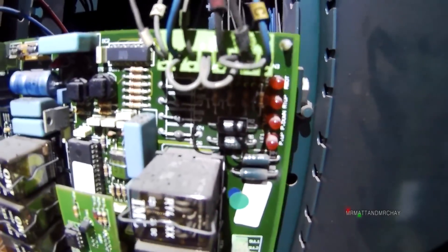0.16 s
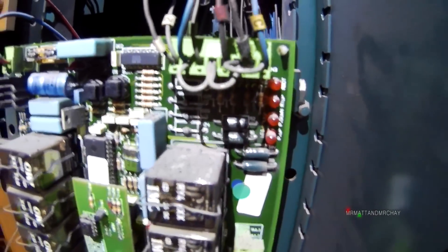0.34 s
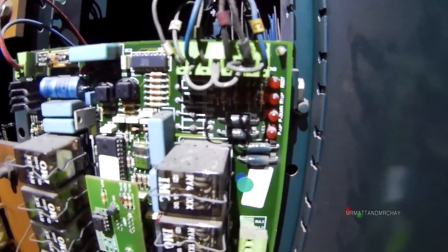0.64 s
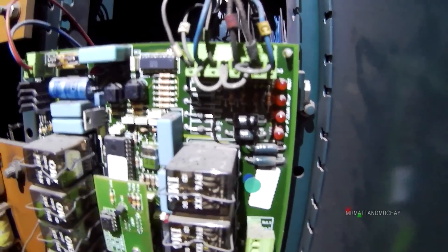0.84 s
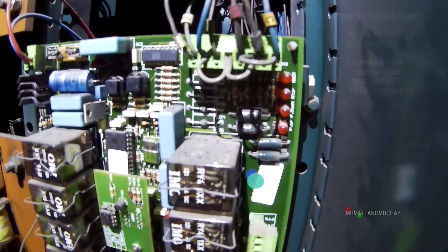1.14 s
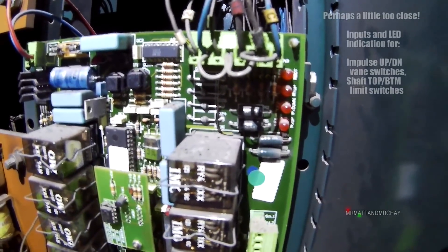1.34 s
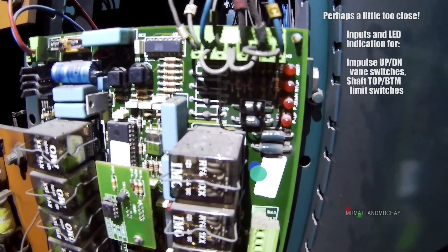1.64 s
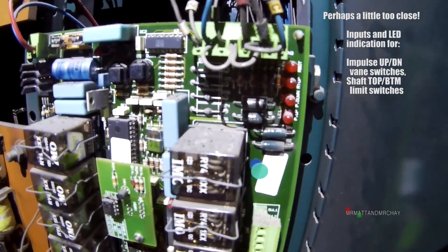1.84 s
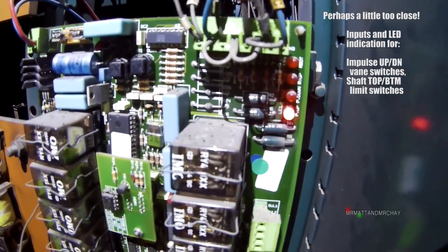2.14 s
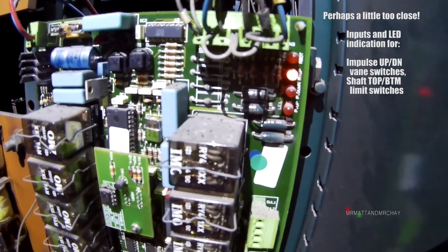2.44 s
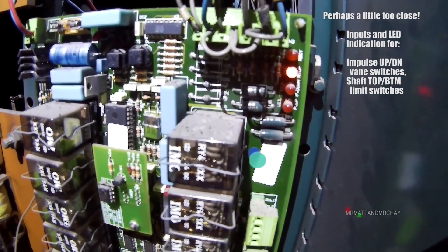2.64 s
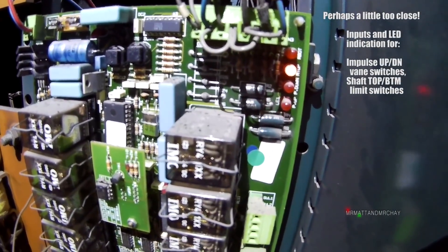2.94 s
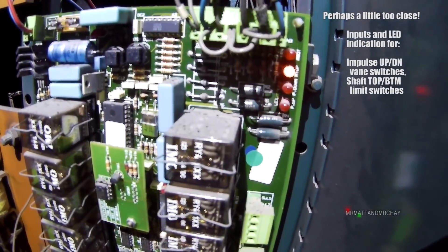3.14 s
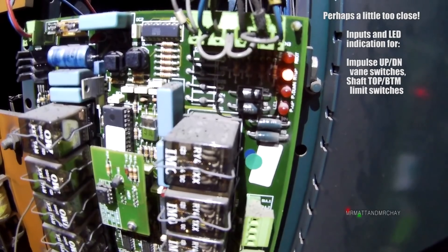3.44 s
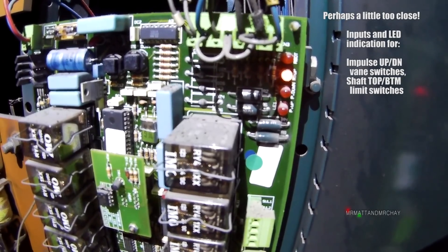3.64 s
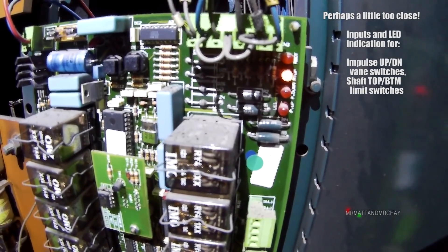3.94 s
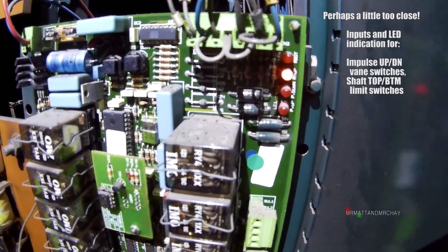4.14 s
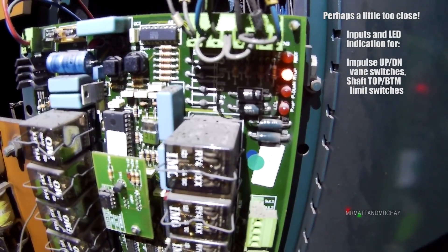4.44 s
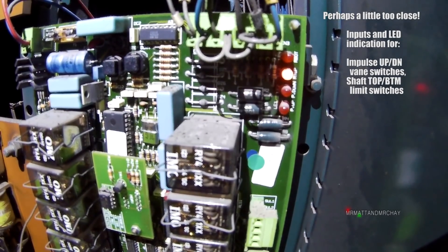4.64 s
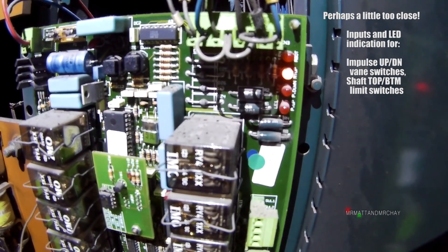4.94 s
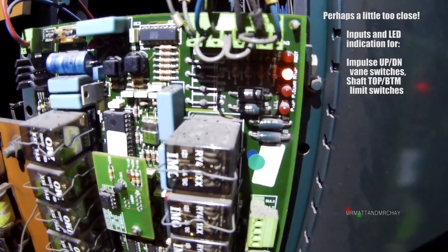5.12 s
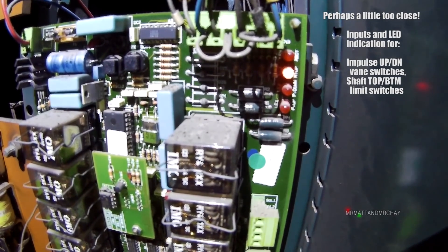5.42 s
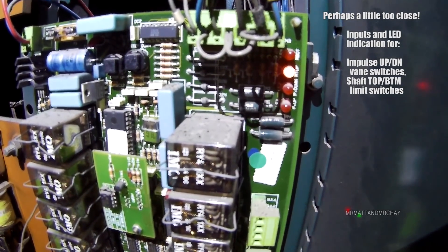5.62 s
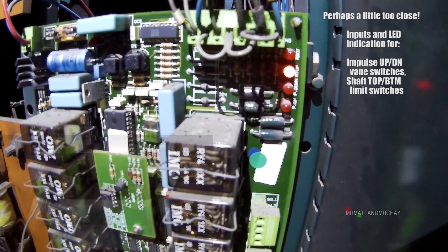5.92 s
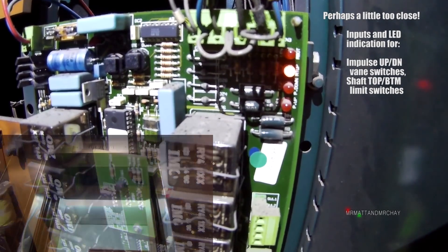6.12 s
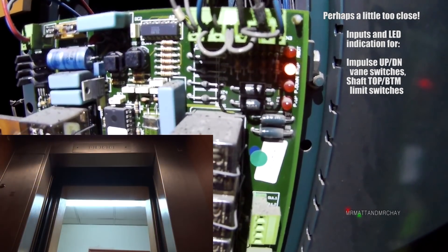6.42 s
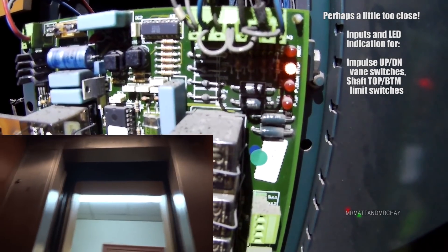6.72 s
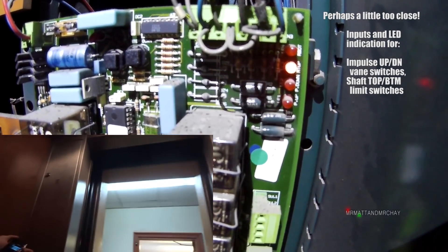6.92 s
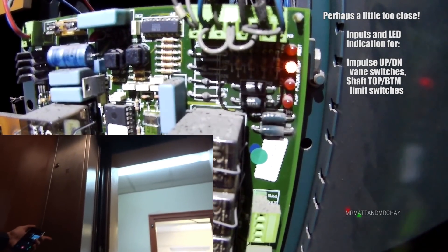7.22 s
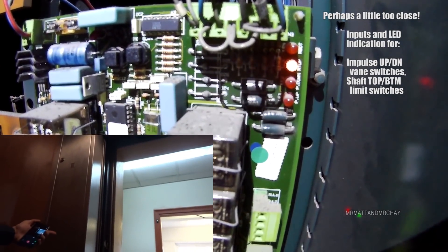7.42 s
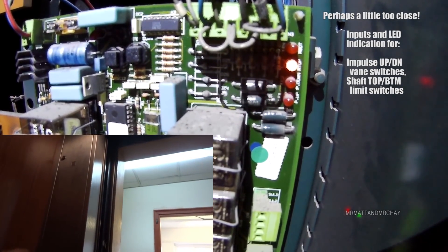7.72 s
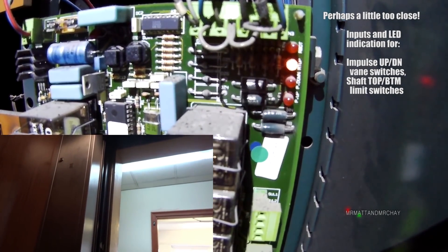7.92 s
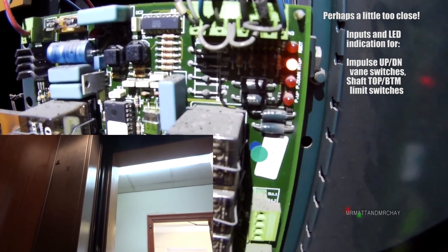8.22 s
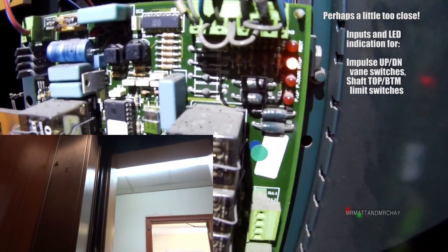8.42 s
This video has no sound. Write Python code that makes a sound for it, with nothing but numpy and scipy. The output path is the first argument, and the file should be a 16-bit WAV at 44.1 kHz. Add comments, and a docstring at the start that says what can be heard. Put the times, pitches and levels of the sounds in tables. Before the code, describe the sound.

Sharp bright relay clicks and heavy contactor clunks punctuate a lift motor going fast, slow, then stopping, leaving faint hum and dull far knocks.

```python
"""Relays snap, bounce and ring on a lift controller in a hard-walled motor room, heard from right beside them.
Each is a burst of shaped noise plus ringing spring tones; contactors add heavier clacks, thuds and booms.
The hoist motor, made of noise and wavering tones, goes from fast to slow and then runs down.
After a pause the last relays and contactors drop and far clunks follow from down the shaft.
Steady mains hum and still room air lie under it all, with a faint tick before and after the clunks."""
import sys
import numpy as np
from scipy import signal
from scipy.fft import rfft, irfft, next_fast_len
from scipy.io import wavfile
from scipy.ndimage import map_coordinates

SR = 44100
rng = np.random.default_rng(int(sys.argv[2]) if len(sys.argv) > 2 else 0)


def file_out(sig):
    """Save sig as 16-bit WAV at sys.argv[1]."""
    # one column per channel
    cols = np.atleast_2d(sig).T
    # limit, then scale
    lim = np.clip(cols, -1, 1)
    pcm = np.round(lim * 32767).astype(np.int16)
    wavfile.write(sys.argv[1], SR, pcm)


N = 377937
TIME = np.arange(N) / SR  # seconds

# In all tables t60 is the time to fade by 60 dB, and levels are those before the final mix.
# Transformer hum and supply whistle. Each row: frequency in Hz, level in dB.
MAINS = [(100, -56), (200, -75), (300, -80), (400, -74.5), (600, -76.5), (13715, -62), (14933, -75)]
# Colour of the still room air. Each row: frequency in Hz, relative level in dB.
AIR_COLOUR = [(20, -9.5), (50, 1.5), (90, -6.5), (160, -18.5), (400, -11), (800, -21), (1300, -21.5),
              (5000, -28), (9800, -24.5), (15500, -33.5)]
# Faint ticks. Each row: start in seconds, level in dB.
TICKS = [(6.868, -45.5), (8.205, -54)]
# Colour of a tick. Each row: frequency in Hz, relative level in dB.
TICK_COLOUR = [(600, -25), (1000, 3), (1500, -16), (3000, -20), (3900, -1), (4800, -20), (9000, -30)]

# Stages of the motor. Each: start in seconds, end of the hold in seconds, level in dB,
# rise in seconds, fall in dB per second.
FAST_RUN = (-1, 2.2, -30, .1, 22)  # whirr on the fast winding
FAST_TONES = (-1, 1.82, 1, .1, 95)  # its whine, which stops quickly once cut
SLOW_RUN = (2.1, 4.75, -34, .3, 32)  # whirr on the slow winding
INRUSH = (2.04, 2.42, -37, .08, 70)  # magnetic buzz as the slow winding brakes the rotor
COASTING = (5.0, 7.0, -53, .2, 17)  # the machine running down
# Colours of the motor's noise. Each row: frequency in Hz, relative level in dB.
FAST_COLOUR = [(20, -30.5), (35, -21.5), (54, -8), (70, -13.5), (170, -15.5), (255, -10.5), (330, -8),
               (410, -9), (870, -10.5), (1150, -9), (1330, -18.5), (2000, -13.5), (3000, -23), (8000, -31),
               (9800, -26), (15500, -44.5)]
SLOW_COLOUR = [(20, -22), (55, -13.5), (160, -14), (340, -8.5), (600, -5.5), (830, -4), (1150, -10),
               (1700, -16.5), (3100, -31.5), (7500, -34), (9600, -28), (12000, -38), (15500, -44.5)]
COAST_COLOUR = [(20, -9), (50, -3), (110, -11), (200, -16), (310, -17), (430, -12), (800, -17), (1100, -29),
                (2200, -33), (3600, -36), (10000, -36), (15500, -39)]
# Tones of the fast winding, slow winding and running down. Each row: frequency in Hz, level in dB.
FAST_LINES = [(145.3, -46), (194, -47.5), (200.8, -36.5), (290.7, -32), (425.3, -47.5), (592.2, -43),
              (656.8, -48), (866.7, -49.5), (1163, -49), (1260, -48.5), (1615, -49), (1868, -53.5),
              (1970, -46.5), (2008, -53), (2363, -47), (2433, -52), (2724, -60)]  # the close pair near 200 Hz beats
SLOW_LINES = [(344.5, -50), (516.8, -51), (592.2, -47), (818.3, -47), (1152, -53), (1217, -56)]
COAST_LINES = [(398.4, -68), (436.0, -66), (608.3, -67), (786.0, -73)]
# Parts of the inrush buzz. Each row: multiple of the lowest hum tone, relative level in dB.
BUZZ = [(1, 0), (2, -1), (3, -11)]

# Blows from down the shaft. Each row: start in seconds, level in dB.
FAR_CLUNKS = [(7.392, -40), (7.411, -30.5), (7.44, -35), (7.495, -35.5)]
# Colour of a far clunk. Each row: frequency in Hz, relative level in dB.
FAR_COLOUR = [(100, -40), (200, -18.5), (350, -10), (480, -10), (580, -11), (780, -1), (950, -6.5),
              (1350, -21.5), (2000, -24.5), (3200, -36.5), (9000, -36.5), (13000, -54.5)]

# Contactor and brake blows. Each row: start in seconds, clack level in dB,
# weight of the moving part from 0 to 1, floor boom in dB relative to the clack.
BLOWS = [(1.991, -21, .35, -21), (2.108, -27, .92, -15), (2.18, -23.5, .3, -19), (2.244, -28.5, .25, -18),
         (2.46, -21.5, .55, -27), (2.484, -19, .92, -24), (2.56, -24.5, 1, -17), (3.764, -22.5, .03, -28),
         (3.928, -14, .22, -19), (4.01, -22, .78, -13.5), (4.242, -25.5, .22, -17), (4.31, -22, .72, -12),
         (4.39, -21.5, .66, -12), (4.475, -24.5, .8, -10.5), (4.63, -30, .68, -11.5),
         (4.818, -15.5, .52, -26), (4.89, -25, .82, -23), (4.975, -26.5, .35, -23), (5.17, -30, .5, -26),
         (7.016, -29.5, .05, -26), (7.046, -24.5, .76, -10)]
# Colour of a clack. Each row: multiple of its centre frequency, relative level in dB.
CLACK_COLOUR = [(.1, -33.5), (.25, -22), (.6, -3), (1, 0.5), (1.5, -5.5), (2.3, -9.5), (3, -10), (3.6, -23),
                (4.7, -17), (9, -25), (17, -41)]
# Colours of the frame's thud and the floor's boom. Each row: frequency in Hz, relative level in dB.
THUD_COLOUR = [(60, -23), (110, -11.5), (160, -7.5), (200, -1), (270, -2), (400, -1.5), (600, -11),
               (1000, -15.5), (3000, -46)]
BOOM_COLOUR = [(20, -19), (38, -6), (54, 1.5), (75, -6), (110, -7), (200, -27), (600, -62)]
# Ringing of the steel cabinet and the room. Each row: frequency in Hz, width in Hz,
# level in dB relative to the direct sound.
CABINET = [(122, 10, 1), (197.4, 5.7, 6.5), (265, 16, -0.5), (364, 9.5, -3), (412.6, 11, -2.5), (436, 8, 0),
           (501.5, 14, 2), (595, 7, 2.5), (651, 10, 1), (788, 16, -3), (869, 30, 1), (1135, 22, -2),
           (1427, 15, -2.5)]

# Relays switching. Each row: start in seconds, snap level in dB, t60 of the snap in seconds,
# rattle of the case in dB relative to the snap.
RELAYS = [(1.846, 0, .095, -18.5), (1.891, -13, .16, -15), (1.907, -9.5, .11, -22), (1.991, 2, .065, -15.5),
          (2.105, -9.5, .05, -17.5), (2.179, -6, .05, -10), (2.219, -2.5, .1, -20), (2.242, -1, .11, -16.5),
          (2.432, -14, .17, -15.5), (2.459, -10, .1, -8), (2.467, 1, .03, -15), (2.484, -2.5, .115, -12.5),
          (2.546, -7.5, .032, -22), (2.565, -9.5, .05, -21), (3.760, -5, .11, -18), (3.907, -28, .15, -14),
          (3.928, 3.5, .038, -16), (4.235, -5, .14, -16), (4.245, -.5, .06, -13), (4.286, -10, .21, -12),
          (4.309, -7.5, .15, -12), (4.326, -7.5, .14, -17), (4.366, -14, .27, -18), (4.392, -10, .19, -11),
          (4.463, -19, .34, -8.5), (4.625, -4.5, .14, -19.5), (4.664, -9, .095, -19.5),
          (4.803, -8, .04, -23), (4.818, -1, .085, -9.5), (4.888, -18, .1, -9), (5.166, -8.5, .11, -23),
          (7.013, -7.5, .22, -22), (7.045, -5.5, .13, -15.5)]
# Tones of relay springs and armature. Each row: frequency in Hz, relative level in dB, t60 in seconds.
SPRINGS = [(6080, -20, 0.11), (7075, -6.5, .18), (7252, -6.5, .18), (8200, -17.5, 0.14), (8730, -11, 0.099),
           (9250, -8.5, .14), (9240, -3, .17), (9217, -5, .15), (9600, 1.5, 0.19), (10060, -1, .16),
           (9740, -4.5, .16), (10500, -2.5, .16), (10560, -6, .12), (13110, -15, 0.087)]
# Colours of the snap and the plastic case. Each row: frequency in Hz, relative level in dB.
SNAP_COLOUR = [(2500, -44.5), (4200, -16), (5000, -16.5), (6000, -9), (7100, -7), (7900, -8.5), (9000, -2),
               (9700, 2), (10700, -7.5), (12000, -10), (15500, -15)]
CASE_COLOUR = [(400, -25.5), (1000, -5.5), (1700, 0.5), (2400, 0.5), (3100, -8.5), (3900, -0.5), (5000, -5),
               (8000, -18)]
# Echo of the bare walls. Each row: frequency in Hz, t60 in seconds.
ROOM = [(100, 0.98), (400, .9), (1300, 0.98), (3500, 0.6), (9500, 0.4), (15000, .3)]


def amp(db):
    """Turn decibels into a gain."""
    return 10 ** (np.asarray(db) / 20)


def unit(x):
    """Scale a sound to an average (rms) strength of 1."""
    return x / np.sqrt(np.mean(x ** 2) + 1e-20)


def along(points, hz):
    """Read values between (Hz, value) points, with frequency on a log axis."""
    f, v = np.transpose(points)
    return np.interp(np.log(hz + 1), np.log(f + 1), v)


def wobble(rate):
    """Draw a smooth random curve with this many random points a second."""
    knots = rng.standard_normal(int(N * rate / SR) + 4)
    return map_coordinates(knots, [TIME * rate])


def flicker(t, rate):
    """Draw a smooth random curve for a short sound; it repeats after 256 random points."""
    return map_coordinates(rng.standard_normal(256), [t * rate], mode="wrap")


def noise(colour, size, body=1):
    """Make noise of rms 1 with a colour, passed through the resonances of a body."""
    hz = np.fft.rfftfreq(size, 1 / SR)
    white = rfft(rng.standard_normal(size))
    return unit(irfft(white * amp(along(colour, hz)) * body, size))


def resonances(size, width_hz, depth_db):
    """Imitate the many close resonances of a solid body: even peaks with deeper notches between."""
    hz = np.fft.rfftfreq(size, 1 / SR)
    ripple = map_coordinates(rng.standard_normal(2 ** 13), [hz / width_hz], mode="wrap")
    return amp(depth_db * np.minimum(ripple, 1))


def fade(t, t60, attack):
    """Rise quickly, then die away exponentially, as a struck object does."""
    return np.exp(-np.log(1000) * t / t60) * (1 - np.exp(-t / attack))


def stage(on, off, db, rise_s, fall_db_per_s):
    """Give a motor stage its loudness: a straight rise, a hold and a steady fall in dB."""
    rise = np.clip((TIME - on) / rise_s, 0, 1)
    return rise * amp(db - fall_db_per_s * np.maximum(TIME - off, 0))


def add(track, s, sound):
    """Mix a sound into a track, starting at s seconds."""
    part = track[round(s * SR):][:len(sound)]
    part += sound[:len(part)]


def cabinet(x):
    """Add the ringing of each cabinet and room resonance to the direct sound."""
    size = next_fast_len(N + SR)
    f = np.fft.rfftfreq(size, 1 / SR)
    ringing = sum(amp(db) * 1j * f * width / (hz * hz - f * f + 1j * f * width)
                  for hz, width, db in CABINET)
    return irfft(rfft(x, size) * (1 + ringing), size)[:N]


def room(x):
    """Make the echo of bare walls from fading noise, whose treble dies first."""
    hz, t, grid = signal.stft(rng.standard_normal(SR), SR, nperseg=256)
    decay = np.exp(-np.log(1000) * t / along(ROOM, hz)[:, None])
    tail = signal.istft(grid * decay, SR, nperseg=256)[1]
    return signal.fftconvolve(x, tail / np.linalg.norm(tail))[:N]


def mains():
    """Steady sine tones make the controller's hum and whistle over the noise of still room air."""
    hum = sum(amp(db) * np.sin(2 * np.pi * (hz * TIME + rng.random())) for hz, db in MAINS)
    return np.sqrt(2) * hum + amp(-60) * noise(AIR_COLOUR, N)


def ticks():
    """Short bursts of shaped noise make small dry ticks in the quiet."""
    out, t = np.zeros(N), TIME[:SR // 4]
    for s, db in TICKS:
        add(out, s, amp(db) * noise(TICK_COLOUR, len(t)) * fade(t, t60=.084, attack=.0034))
    return out


def whine(lines):
    """Tones drift together with the shaft, while each wavers a little in strength and phase."""
    drift = np.cumsum(.0015 * wobble(4.5)) / SR
    return sum(amp(db + 1.6 * wobble(7)) * np.sin(2 * np.pi * hz * (TIME + drift) + .58 * wobble(9))
               for hz, db in lines)


def motor():
    """Whirr resonates in the casing; the slow winding buzzes and labours as it brakes the rotor."""
    casing = resonances(N, width_hz=16, depth_db=3.5)
    fast, slow, coast = stage(*FAST_RUN), stage(*SLOW_RUN), stage(*COASTING)
    # The slow winding runs 7 dB louder until the buzz starts to fall, then eases (0.3 s time constant).
    effort = amp(7 * np.exp(-np.maximum(TIME - INRUSH[1], 0) / .3))
    whirr = fast * noise(FAST_COLOUR, N, casing) + effort * slow * noise(SLOW_COLOUR, N, casing)

    fast_tones = stage(*FAST_TONES) * whine(FAST_LINES)
    slow_tones = amp(-2) * slow / slow.max() * whine(SLOW_LINES)
    hum_hz = MAINS[0][0]
    buzz = stage(*INRUSH) * sum(amp(db) * np.sin(2 * np.pi * k * hum_hz * TIME) for k, db in BUZZ)

    coast_noise = coast * noise(COAST_COLOUR, N, casing)
    coast_tones = amp(3) * coast / coast.max() * whine(COAST_LINES)
    return amp(-2.5) * cabinet(whirr) + coast_noise + coast_tones + fast_tones + slow_tones + buzz


def far_clunks(panel_hz=785, panel_width_hz=60, panel_db=-2):
    """Dull blows from the door gear ring a panel, with the close resonances of the shaft."""
    out, t = np.zeros(N), TIME[:SR]
    hz = np.fft.rfftfreq(len(t), 1 / SR)
    shaft = resonances(len(t), width_hz=16, depth_db=5.5)
    panel = 1 + amp(panel_db) / np.hypot(1, (hz - panel_hz) / panel_width_hz)
    for s, db in FAR_CLUNKS:
        add(out, s, amp(db) * noise(FAR_COLOUR, len(t), shaft * panel) * fade(t, t60=.44, attack=.004))
    return out


def return_spring(hz=2365, db=-35.5, t60=1.0):
    """A spring sings one slightly wavering, dying tone after the last contactor drops."""
    t = np.maximum(TIME - BLOWS[-1][0], 0)
    return amp(db) * fade(t, t60, attack=.03) * np.sin(2 * np.pi * hz * TIME + .15 * wobble(25))


def contactors():
    """Heavy armatures clack, and frame and floor answer; heavier parts sound lower and ring longer."""
    out, t = np.zeros(N), TIME[:SR]
    for s, db, weight, boom_db in BLOWS:
        # Each setting goes from the lightest part to the heaviest.
        centre_hz = 1330 * (740 / 1330) ** weight
        t60 = .33 * (.92 / .33) ** weight  # seconds
        thud_db = np.interp(weight, [0, 1], [-15, 5])
        frame = resonances(len(t), width_hz=30, depth_db=3)
        colour = [(ratio * centre_hz, gain) for ratio, gain in CLACK_COLOUR]
        chatter = amp(2.2 * flicker(t, rate=130))  # loose parts rattle on
        clack = noise(colour, len(t), frame) * fade(t, t60, attack=.0019) * chatter
        thud = noise(THUD_COLOUR, len(t), frame) * fade(t, t60 * 1.62, attack=.0099)
        boom = noise(BOOM_COLOUR, len(t)) * fade(t, t60 * 2.7, attack=.015)
        add(out, s, amp(db) * (clack + amp(thud_db) * thud + amp(boom_db) * boom))
    return out


def bouncing(t, t60):
    """A contact closes and bounces once, weaker; a longer snap has a softer start and a later bounce."""
    attack, flight_s = .03 * t60, .11 * t60
    bounce = amp(-7) * fade(np.maximum(t - flight_s, 0), t60, attack)
    return np.hypot(fade(t, t60, attack), bounce)


def relays():
    """Contacts snap and bounce, springs ring and plastic cases rattle; more case means a duller snap."""
    out, t = np.zeros(N), TIME[:SR // 2]
    # Octaves above or below 9000 Hz, the pivot for dulling the snap.
    octave = np.log2(np.clip(np.fft.rfftfreq(len(t), 1 / SR), 3000, None) / 9000)
    hz, mode_db, mode_t60 = np.transpose(SPRINGS)[:, :, None]
    modes = amp(mode_db) * fade(t, mode_t60, attack=.001)
    for s, db, t60, case_db in RELAYS:
        bright_db = .33 * (-17 - case_db)  # dB per octave; a case at -17 dB leaves the snap neutral
        body = resonances(len(t), width_hz=140, depth_db=6.5)  # drawn anew for every snap
        snap = noise(SNAP_COLOUR, len(t), body * amp(bright_db * octave)) * bouncing(t, t60)
        case_body = resonances(len(t), width_hz=72, depth_db=3)
        case = noise(CASE_COLOUR, len(t), case_body) * fade(t, t60 * 1.85, attack=.001)

        detune, strength, phase = rng.standard_normal((3, len(SPRINGS), 1))
        tones = np.sin(2 * np.pi * (hz * (1 + .006 * detune) * t + phase))
        ring = np.sum(modes * amp(3 * strength) * tones, axis=0)
        grain = unit(amp(1.5 * flicker(t, rate=400)))  # contacts and case chatter unevenly
        add(out, s, amp(db) * (grain * (snap + amp(case_db) * case) + amp(-19) * ring))
    return out


def scene():
    """Mix the near relays and their echo with the cabinet, the machine and the background."""
    background = mains() + ticks()
    machine = motor() + far_clunks()
    blows = amp(-5) * cabinet(contactors()) + return_spring()
    clicks = amp(-1) * relays()
    return (background + machine + blows + clicks + amp(-10.5) * room(clicks))[None]


def record(dry):
    """Round off the loudest peaks, then remove everything from the top frequency upward."""
    ceiling, top_hz = .85, 15900
    rounded = dry / (1 + np.abs(dry / ceiling) ** 4) ** (1 / 4)
    size = next_fast_len(N + SR // 2)
    keep = np.fft.rfftfreq(size, 1 / SR) < top_hz
    return irfft(rfft(rounded, size) * keep, size)[:, :N]


dry = scene()
out = record(dry)
file_out(out)
```